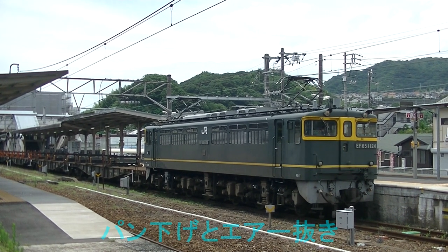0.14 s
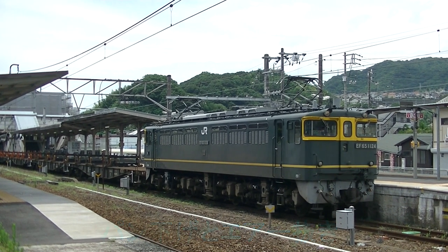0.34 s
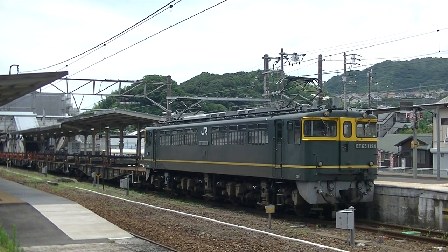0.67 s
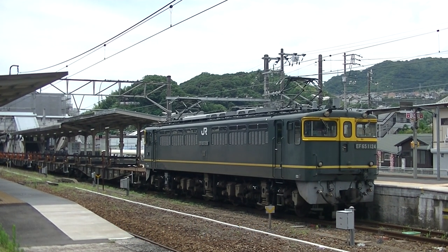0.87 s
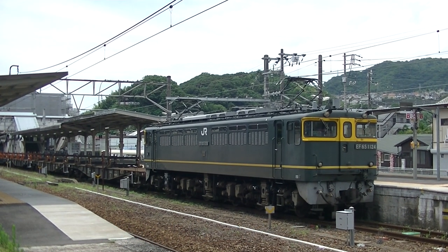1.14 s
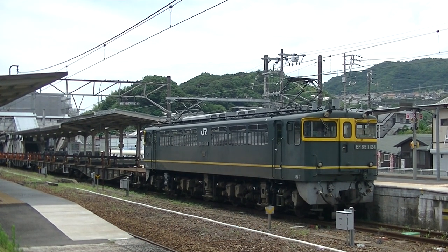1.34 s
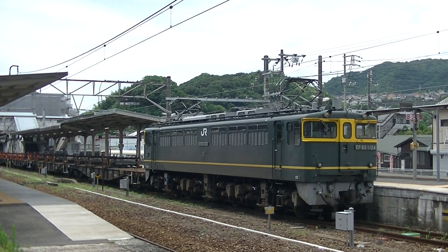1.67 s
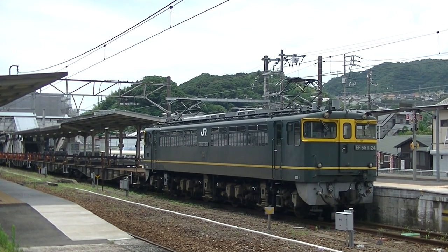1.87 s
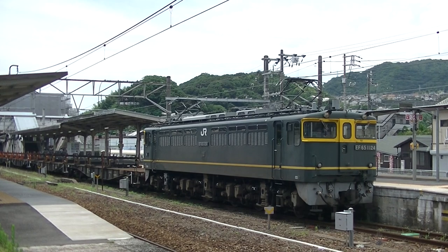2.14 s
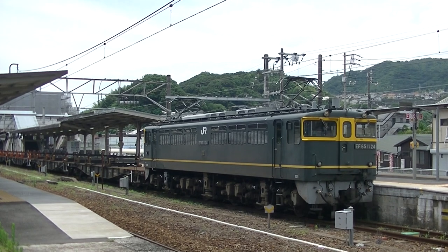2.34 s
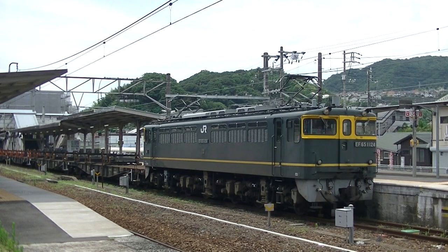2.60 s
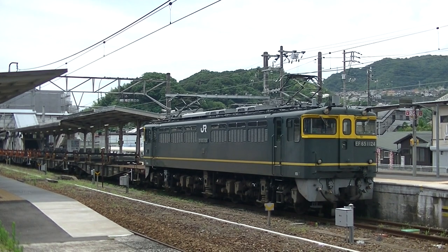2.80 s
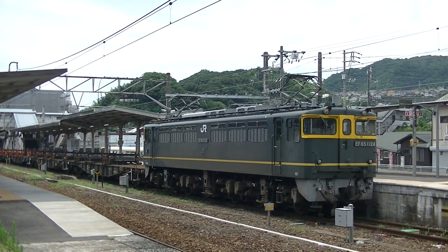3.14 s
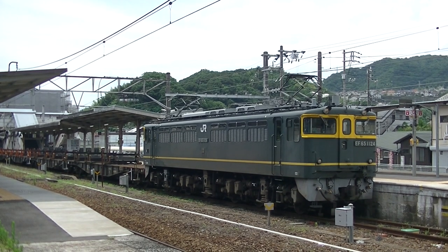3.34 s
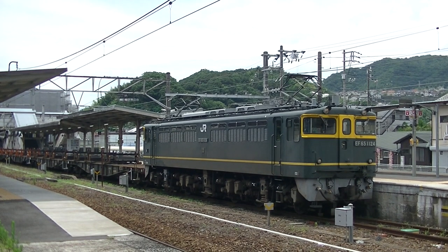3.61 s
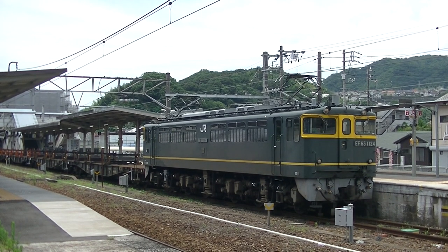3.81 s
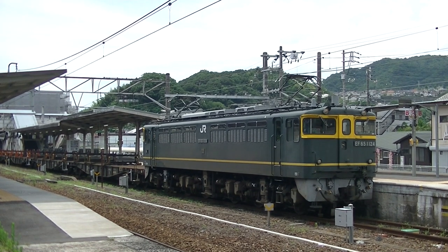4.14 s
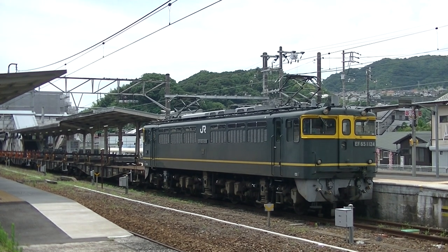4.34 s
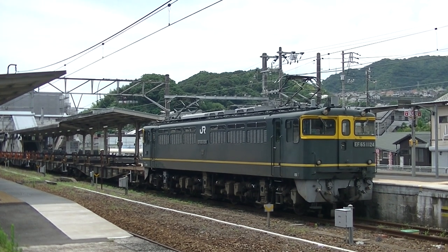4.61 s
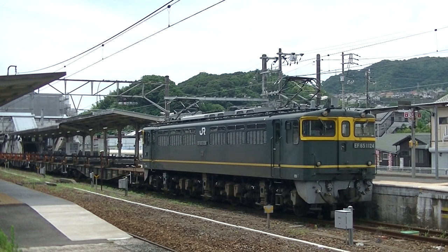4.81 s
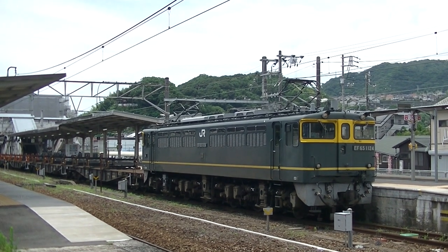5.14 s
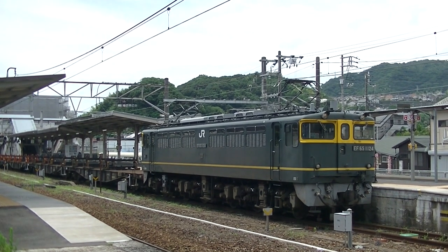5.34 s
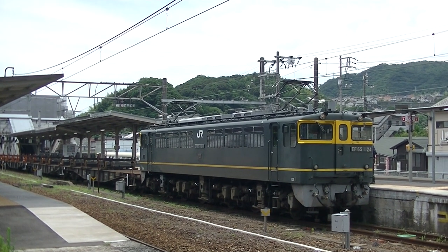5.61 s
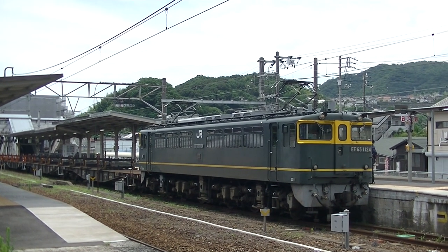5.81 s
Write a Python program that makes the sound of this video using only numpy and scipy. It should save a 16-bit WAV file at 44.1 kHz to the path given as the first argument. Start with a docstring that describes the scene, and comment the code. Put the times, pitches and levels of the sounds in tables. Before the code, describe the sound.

After a short calm of station rumble and thin insect noise, a standing locomotive vents compressed air: sudden, harsh and forceful, with a slight dip, fuller flow and a fleeting whistle. From under two seconds it steadily loses pressure, growing weaker and duller with narrow ringing tones. Late on, folding roof gear bumps, clicks and rattles lightly beneath the remaining hiss. Outdoors, stereo, heard from across the tracks.

```python
"""Railway station, heard across the tracks: a standing electric locomotive lowers its pantograph and dumps its air.
The valve jet (coloured noise) hisses, rings its drain pipe (resonated noise) and roars against the ballast;
it fades and dulls as the pressure falls. A brief whistle is a gliding sine.
Late on the roof gear knocks and settles: decaying bursts of resonant noise.
Behind it: low station rumble and insects in the hills (noise), one far bird (sine)."""
import sys
import numpy as np
from scipy import signal
from scipy.fft import rfft, irfft, next_fast_len
from scipy.io import wavfile
from scipy.ndimage import uniform_filter1d, map_coordinates

SR = 44100
rng = np.random.default_rng(int(sys.argv[2]) if len(sys.argv) > 2 else 0)


def digitize_waveform(pressure):
    """Quantize a signal to 16-bit integers and store it at the path in sys.argv[1].

    Rows of a 2-D input are taken as channels; values are limited to [-1, 1].
    """
    field = np.atleast_2d(pressure).T
    bounded = np.clip(field, -1, 1)
    quanta = np.round(bounded * 32767).astype(np.int16)
    wavfile.write(sys.argv[1], SR, quanta)


N = 263277
T = np.arange(N) / SR
HZ = np.linspace(1, SR / 2, 2 ** 15)  # grid of all filter gains
OPEN_S = 0.8664  # the valve starts to open


def undb(db):
    """Decibels to gain."""
    return 10 ** (np.asarray(db) / 20)


def unit(x):
    """Scale to rms 1."""
    return x / np.sqrt(np.mean(x ** 2))


def colour(points):
    """Gain by frequency from (Hz, dB) points, straight over log frequency."""
    hz, db = np.transpose(points)
    return undb(np.interp(np.log(HZ), np.log(hz), db))


def band(lo_hz, hi_hz, order=12):
    """Gain of a band-pass, steep by default."""
    low_cut = 1 + (lo_hz / HZ) ** (2 * order)
    high_cut = 1 + (HZ / hi_hz) ** (2 * order)
    return 1 / np.sqrt(low_cut * high_cut)


def resonances(modes, order=1):
    """Gain of (Hz, width Hz, dB) resonances added in power; order 2 has steeper skirts."""
    power = 0
    for hz, width_hz, db in modes:
        power = power + undb(db) ** 2 / (1 + (2 * (HZ - hz) / width_hz) ** 2) ** order
    return np.sqrt(power)


def ripple(depth_db, spacing_hz):
    """Gain of many weak, crowded pipe resonances."""
    knots_hz = np.arange(0, SR, spacing_hz)
    return undb(depth_db * np.interp(HZ, knots_hz, rng.standard_normal(len(knots_hz))))


def filtered(x, gain):
    """Give a sound a gain by frequency."""
    size = next_fast_len(N + SR // 4)
    bins_hz = np.arange(size // 2 + 1) * SR / size
    return irfft(rfft(x, size) * np.interp(bins_hz, HZ, gain), size)[:N]


def noise(gain):
    """Turbulence of a given colour, rms 1."""
    return unit(filtered(rng.standard_normal(N), gain))


def walk(rate):
    """Slow chance with spread 1, about rate changes a second."""
    hold = int(SR / rate)
    steps = np.repeat(rng.standard_normal(N // hold + 1), hold)
    return unit(uniform_filter1d(steps, hold)[:N])


def ramp(from_s, over_s):
    """Steady change from 0 to 1."""
    return np.clip((T - from_s) / over_s, 0, 1)


def opening(rise_s):
    """Smooth step from shut to open as the valve turns."""
    return np.sin(np.pi / 2 * ramp(OPEN_S, rise_s)) ** 2


def blow(at_s, t60_s, rise_s=0.0014):
    """Envelope of one contact: quick rise, exponential decay."""
    age_s = np.maximum(T - at_s, 0)
    return (1 - np.exp(-age_s / rise_s)) * np.exp(-np.log(1000) * age_s / t60_s)


def tone(track, waver):
    """A wavering sine along (s, Hz, dB) points; waver is the rms share of pitch."""
    s, hz, db = np.transpose(track)
    pitch_hz = np.interp(T, s, hz) * (1 + waver * walk(330))
    sine = np.sqrt(2) * np.sin(2 * np.pi * np.cumsum(pitch_hz) / SR)
    return sine * undb(np.interp(T, s, db)) * (T > s[0]) * (T < s[-1])


def scatter(x, t60_s):
    """Dense fixed reflections from ballast, bogies and platform; they comb the spectrum finely."""
    age_s = T[:SR // 4]
    echoes = rng.standard_normal(len(age_s)) * np.exp(-np.log(1000) * age_s / t60_s)
    return signal.fftconvolve(x, echoes / np.linalg.norm(echoes))[:N]


def pressure_mix(from_s, over_s):
    """Shares of the high- and low-pressure colours as the reservoir empties, constant in power."""
    spent = ramp(from_s, over_s)
    return np.sqrt(1 - spent), np.sqrt(spent)


def flow(level_db, sag_db, widen_db, fall_db_per_s):
    """Gain of one jet sound: first rush, brief sag, full flow, then an exponential fall with the pressure."""
    sag_s, sag_half_s = 1.134, 0.07
    drain_s, drain_turn_s = 1.738, 0.085  # start of the fall, softness of the turn
    sag = np.exp(-((T - sag_s) / sag_half_s) ** 2)
    narrow = 1 - ramp(from_s=1.14, over_s=0.47)  # the valve opens wide
    draining_s = drain_turn_s * np.logaddexp(0, (T - drain_s) / drain_turn_s)
    return undb(level_db - sag_db * sag - widen_db * narrow - fall_db_per_s * draining_s)


def climbing(x):
    """Resonances climb as the flow in the pipe slows: read ever faster, at listed pitch at 5.05 s."""
    climb_per_s = 0.012
    place = np.cumsum(1 + climb_per_s * (T - 5.05))
    return map_coordinates(x, [place], order=5, mode="mirror")


def surroundings():
    """Station rumble that swells a little, and a near-steady chorus of insects with faint air."""
    # noise colours: f/Hz, relative level/dB
    station = [(12, -63), (20, -36), (38, -15), (59, -12), (85, -9.5), (124, -6.5), (239, -6), (355, -5),
               (387, -10.5), (614, -22), (953, -21.5), (1090, -28), (1190, -25.5), (1450, -28),
               (3800, -25.5), (4940, -59), (8360, -120)]
    insect_air = [(2240, -38), (3800, -5), (4130, -8), (4460, -2), (4740, -1), (6460, -15), (6940, -13.5),
                  (9350, -20), (14100, -25), (15800, -32)]
    station_db, insect_db = -51, -57
    rumble = noise(colour(station) * band(10, 3600)) * undb(station_db + 0.86 * walk(14))
    insects = noise(colour(insect_air) * band(3900, SR)) * undb(insect_db + 0.52 * walk(25))
    return rumble + insects


def bird():
    """One far note, a slightly wavering sine."""
    # pitch track: t/s, f/Hz, level/dB
    note = [(.25, 1150, -81), (.29, 1160, -66), (.35, 1180, -65), (.39, 1175, -69), (.42, 1165, -85)]
    return tone(note, waver=0.004)


def jet():
    """Hiss from the valve and the drain pipe it rings; the resonances stand out more as pressure falls."""
    # jet colour at high and at low pressure: f/Hz, relative level/dB
    jet_full = [(2590, -29), (4400, -2), (4920, -2.5), (5310, -5), (5810, -4.5), (5970, -2), (6230, -3),
                (6680, 2), (7240, -4), (8230, -4.5), (9660, -13.5), (10800, -13), (11800, -19),
                (13500, -17), (15800, -29.5)]
    jet_spent = [(2590, -31), (4400, -12), (4640, -13), (5190, -7.5), (5720, 3.5), (6300, 2.5), (7350, -1),
                 (7840, -7.5), (8820, -8.5), (9510, -5.5), (10500, -13.5), (11600, -17.5), (12800, -26),
                 (13300, -21), (15800, -27)]
    # upper pipe resonances at high and at low pressure: f/Hz, width/Hz, relative level/dB
    modes_full = [(4760, 160, -9), (5120, 25, 3), (5550, 98, -0.5), (6200, 90, 0.5), (6200, 36, 8),
                  (6590, 110, -6), (7450, 46, -11), (7600, 32, 4.5), (10400, 84, -13), (10530, 46, -13)]
    modes_spent = [(4850, 30, -3), (5230, 29, -3), (5280, 26, -5), (5910, 23, -4), (6050, 69, -5.5),
                   (6430, 41, 4), (8050, 150, -5), (8350, 23, -6), (8730, 33, -8), (8830, 48, -7.5),
                   (10350, 40, -20), (10200, 33, -19), (10920, 39, -9.5), (12600, 73, -17)]
    # broad drain-pipe resonances: f/Hz, width/Hz, relative level/dB
    pipe_broad = [(3246, 300, -2.5), (3850, 530, 0.5), (4070, 1030, -2.5)]
    # sharp resonances on the pipe's ring: f/Hz, relative level/dB
    pipe_sharp = [(3262, -42.5), (3381, -40.5), (3445, -45.5), (3634, -40.5), (3693, -37.5), (3817, -37.5),
                  (3898, -39.5), (3962, -41.5), (4097, -39.5), (4221, -44), (4307, -42), (4387, -42.5)]
    # response to the flow: full-flow gain/dB, sag depth/dB, gain on widening/dB, fall/(dB/s)
    hiss_law = (-21.5, 1.5, -0.1, 6)
    pipe_law = (-18.6, 2, 1.8, 4)

    full, spent = pressure_mix(from_s=2.36, over_s=1.96)
    treble = band(4090, SR)
    strong = undb(-1.08) * noise(colour(jet_full) * treble * ripple(depth_db=0.6, spacing_hz=39.4))
    strong += undb(-10.5) * noise(resonances(modes_full, order=2))
    weak = undb(-0.5) * noise(colour(jet_spent) * treble * ripple(depth_db=3.5, spacing_hz=50.9))
    weak += undb(-4.0) * noise(resonances(modes_spent) * treble * band(20, 13500))
    hiss = full * strong + spent * climbing(weak)
    # the first narrow gap of the valve spits brighter air
    spit = noise(resonances([(8470, 1300, 0)], order=2))
    hiss += undb(1.5) * blow(OPEN_S, 0.32) * spit

    ring = resonances([(hz, 25, db) for hz, db in pipe_sharp], order=2)
    pipe = undb(-2.5) * noise(resonances(pipe_broad, order=2) * band(2300, 6300))
    pipe += undb(-4.5) * noise(ring)
    # chance swell, and extra ring only in the fast flow
    ring_db = 0.4 * walk(16) - 5.0 * ramp(from_s=2.06, over_s=0.74)
    hiss = hiss * flow(*hiss_law) * opening(rise_s=0.055)
    return hiss + pipe * flow(*pipe_law) * undb(ring_db) * opening(rise_s=0.085)


def eddies():
    """The jet strikes the ballast; larger eddies take longer to build and roar low."""
    # rush colour at high and at low pressure, roar colour: f/Hz, relative level/dB
    rush_full = [(280, -41), (480, -10), (631, -12.5), (761, -10), (1050, -15.5), (1120, -19.5),
                 (1300, -10), (1410, -15.5), (1520, -12), (1840, -14.5), (2110, -6.5), (2760, -7),
                 (3100, -3), (4030, -30), (6820, -120)]
    rush_spent = [(280, -39), (480, -10), (535, -2), (579, -9.5), (773, -2.5), (954, -10.5), (1220, -7),
                  (1450, -11), (1550, -9), (1820, -11), (2220, -9), (2910, -4), (3100, -6.5), (4030, -37),
                  (6820, -120)]
    roar_colour = [(29, -59), (50, -42), (81, -19), (100, -17), (113, -4.5), (174, -8.5), (211, -1),
                   (262, -4.5), (295, -9.5), (362, 1.5), (436, -11), (490, -6), (520, -27), (680, -47),
                   (1140, -120)]
    # response to the flow: full-flow gain/dB, sag depth/dB, gain on widening/dB, fall/(dB/s)
    rush_law = (-31, 1, 2.5, 5.5)
    roar_law = (-29, 2, 6.5, 7.5)

    full, spent = pressure_mix(from_s=2.5, over_s=1.57)
    middle = band(517, 2950)
    rush = full * noise(colour(rush_full) * middle) + spent * noise(colour(rush_spent) * middle)
    # the pipe's lowest resonances: one speaks in the fast flow, another in the slow
    rush += undb(-9.5) * full * noise(resonances([(2145, 330, 0)], order=2))
    rush += undb(-14) * spent * noise(resonances([(1560, 24, 0)], order=2))
    roar = noise(colour(roar_colour) * band(22, 468))
    return (rush * flow(*rush_law) + roar * flow(*roar_law)) * opening(rise_s=0.1)


def whistle():
    """Brief whistle at the valve lip, a sine unsteady in pitch and level."""
    # pitch track: t/s, f/Hz, level/dB
    lip_track = [(1.38, 6950, -50), (1.41, 6870, -23), (1.44, 6680, -27), (1.46, 6080, -21),
                 (1.48, 6120, -22), (1.495, 6200, -41), (1.515, 6190, -23), (1.55, 6170, -55)]
    return tone(lip_track, waver=0.0111) * undb(2 * walk(150))


def pantograph():
    """Linkage knocks and frame bumps ring metal as decaying noise; loose metal rattles late."""
    # sharp linkage knocks: t/s, relative level/dB
    knocks = [(5.317, -31), (5.386, -28), (5.813, -34), (5.898, -41.5), (5.918, -38.5)]
    # soft bumps of the folding frame: t/s, level/dB, body f/Hz, width/Hz, t60/s, linkage share/dB
    bumps = [(3.815, -36.5, 270, 200, 0.16, -14), (3.922, -32, 310, 160, 0.1, -18),
             (4.075, -33, 300, 260, 0.24, -15), (4.15, -39.5, 330, 250, 0.22, 1.5),
             (4.256, -36, 350, 120, 0.13, -16), (4.382, -32, 216, 80, 0.18, -3),
             (4.688, -35, 332, 150, .12, -14), (5.08, -40, 353, 130, 0.39, -21),
             (5.657, -37.5, 220, 260, 0.52, -10.5), (5.752, -30.5, 524, 340, 0.11, -22),
             (5.769, -30.5, 334, 320, 0.25, -12.5)]
    # linkage resonances: f/Hz, width/Hz, relative level/dB
    linkage_modes = [(676, 760, -2.5), (1175, 260, 1), (1850, 1200, -7)]

    linkage = resonances(linkage_modes, order=2)
    contacts = sum(undb(db) * blow(s, 0.016, rise_s=0.00066) for s, db in knocks)
    out = undb(4) * contacts * noise(linkage)
    scrape = noise(linkage)
    for s, db, hz, width_hz, t60_s, linkage_db in bumps:
        # thin tubes radiate no deep bass
        body = noise(resonances([(hz, width_hz, 0)], order=2) * band(135, 1000, order=3))
        out += undb(db) * blow(s, t60_s, rise_s=0.0078) * (body + undb(linkage_db) * scrape)
    rattle = noise(band(3200, 7200, order=4)) * undb(1.2 * walk(200))
    return out + undb(-30.5) * blow(5.752, 0.15, rise_s=0.0043) * rattle


def scene():
    """The locomotive lies ahead, wide mostly in the treble; the surroundings arrive from all sides."""
    # side gain of the locomotive and of the surroundings: f/Hz, gain/dB
    engine_width = [(30, -14), (70, -24), (190, -34), (330, -18.5), (550, -19.5), (770, -24), (1000, -18.5),
                    (1900, -17), (2650, -1), (3300, -10.5), (4000, -28), (4550, -22), (5050, -3.5),
                    (7000, -4), (9500, -0.5), (14000, -5)]
    open_air_width = [(30, -13), (130, -18), (320, -16), (600, -10), (1100, -12), (1500, -6), (2900, -5),
                      (4500, -10.5), (5800, -2.5), (14000, -1.5)]

    flutter = undb(0.38 * walk(35))
    engine = (jet() + eddies()) * flutter + pantograph() + whistle()
    # small parts and stones reflect only the shorter waves
    glints = filtered(scatter(engine, t60_s=0.32), band(720, SR, order=2))
    mid = undb(-0.58) * engine + undb(-5.5) * glints + surroundings() + bird()
    # reflections plus an independent draw of the jet
    diffuse = undb(-4.5) * (scatter(engine, t60_s=0.082) + (jet() + eddies()) * flutter)
    side = filtered(diffuse, colour(engine_width)) + filtered(surroundings(), colour(open_air_width))
    right_db = 0.18
    return np.array([(mid + side) * undb(-right_db), (mid - side) * undb(right_db)])


def record(dry):
    """Steep elliptic low-pass cuts the top."""
    top_hz = 15700
    return signal.sosfilt(signal.ellip(12, 0.1, 80, top_hz, fs=SR, output="sos"), dry)


dry = scene()
out = record(dry)
digitize_waveform(out)
```